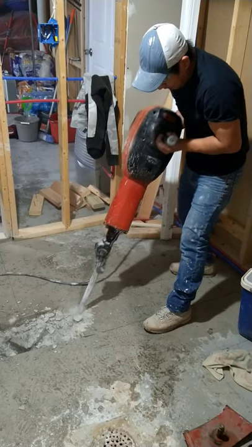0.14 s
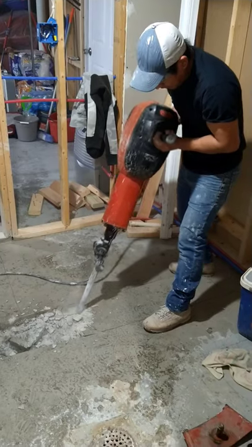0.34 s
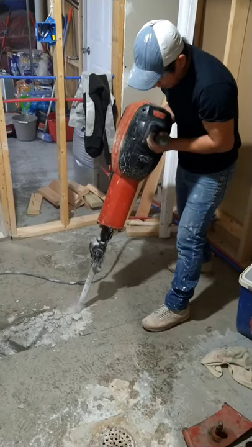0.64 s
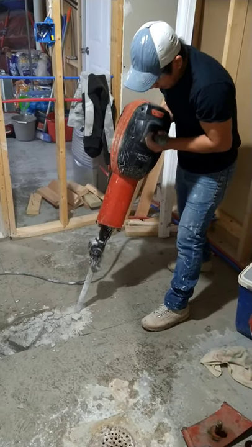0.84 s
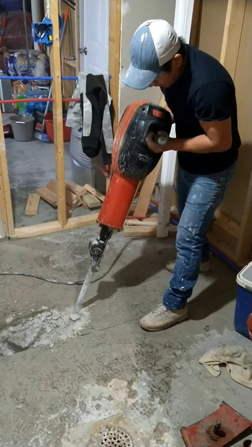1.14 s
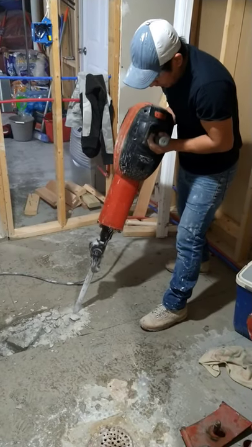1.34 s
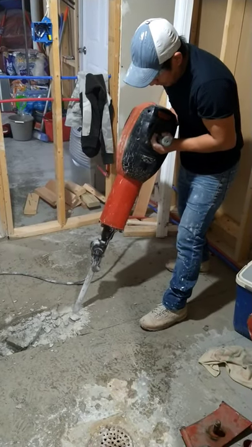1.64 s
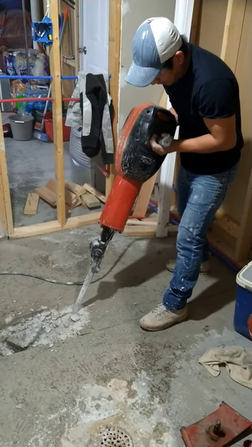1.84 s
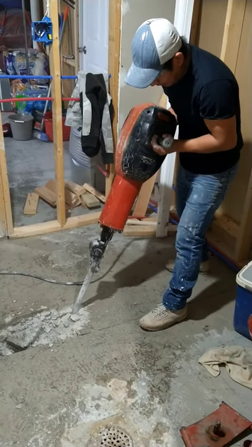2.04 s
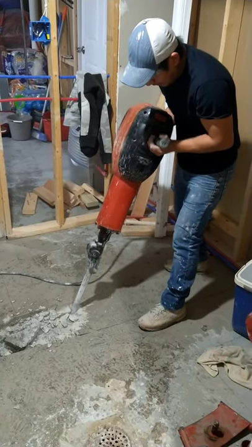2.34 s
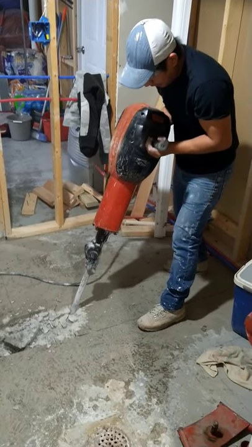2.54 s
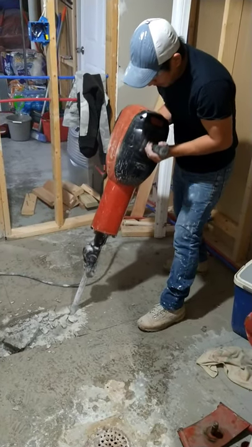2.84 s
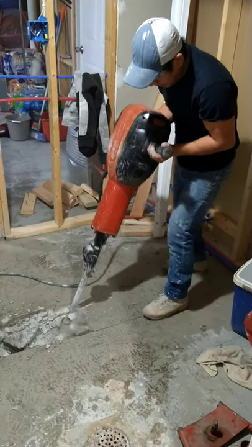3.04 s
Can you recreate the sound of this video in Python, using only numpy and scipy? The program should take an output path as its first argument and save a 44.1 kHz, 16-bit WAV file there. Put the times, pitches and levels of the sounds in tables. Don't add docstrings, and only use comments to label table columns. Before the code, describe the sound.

Electric breaker hammering concrete indoors, fast steady thuds with metallic chisel ring and cracking stone.

```python
import sys
import numpy as np
from scipy import signal
from scipy.fft import rfft, irfft, next_fast_len
from scipy.io import wavfile
from scipy.ndimage import uniform_filter1d

SR = 44100
rng = np.random.default_rng(int(sys.argv[2]) if len(sys.argv) > 2 else 0)


def rack_gain(trim_db):
    fader = np.asarray(trim_db, float)
    return 10 ** (fader / 20)


def waveform_to_disk(signal):
    frames = np.transpose(np.atleast_2d(signal))
    scaled = np.clip(frames, -1, 1) * 32767
    samples = np.round(scaled).astype(np.int16)
    wavfile.write(sys.argv[1], SR, samples)


N = 140238
FIRST_BLOW = -12


def unit(x):
    return x / np.sqrt(np.mean(x ** 2) + 1e-20)


def along(points, hz):
    point_hz, value = np.transpose(points)
    return np.interp(np.log(hz + 1), np.log(point_hz + 1), value)


def filtered(x, response):
    m = next_fast_len(x.shape[-1] + SR)
    hz = np.fft.rfftfreq(m, 1 / SR)
    return irfft(rfft(x, m) * response(hz), m)[..., :x.shape[-1]]


def causal(spectrum):
    def response(hz):
        cepstrum = irfft(np.log(rack_gain(along(spectrum, hz)) + 1e-6))
        half = len(cepstrum) // 2
        cepstrum[1:half] *= 2
        cepstrum[half + 1:] = 0
        return np.exp(rfft(cepstrum))
    return response


# pitch_hz [Hz], time to fade by 60 dB fade_s [s]
ROOM_FADE = [(60, 0.35), (500, 0.94), (3000, 1), (8000, 0.39), (16000, 0.18)]
# pitch_hz [Hz], likeness [-1 to 1]
ROOM_LIKENESS = [(60, 1), (180, 0.91), (550, 0.35), (1650, -0.14), (4970, -0.075), (15000, 0.45)]


def room(x):
    rise_s = 0.0039
    hz, t, z = signal.stft(rng.standard_normal((2, SR // 2)), SR, nperseg=256)
    angle = np.arccos(np.clip(along(ROOM_LIKENESS, hz), -1, 1))[:, None] / 2
    mid, side = z[0] * np.cos(angle), z[1] * np.sin(angle)
    fade = rack_gain(-60 * t / along(ROOM_FADE, hz)[:, None]) * (1 - np.exp(-t / rise_s))
    tail = signal.istft(np.array([mid + side, mid - side]) * fade, SR, nperseg=256)[1]
    tail = tail / np.linalg.norm(tail[0])
    delayed = np.pad(np.atleast_2d(x), ((0, 0), (150, 0)))
    return signal.fftconvolve(delayed, tail, axes=1)[:, :x.shape[-1]]


# blow number [count], lag_ms [ms]
BLOW_LAG = [(0, 1.5), (2, 3.3), (3, 1.5), (4, -2.3), (5, -3.3), (7, -2.2), (8, .5), (10, 2.6), (12, 1),
            (15, 3.7), (20, 4.5), (21, 2.8), (26, 4.4), (32, .4), (36, 2.2), (38, 5), (41, 1.6), (45, 0)]
# start_s [s], level_db [dB]
BLOW_FORCE = [(0, -20.5), (.2, -22.5), (.35, -20.5), (.6, -21), (.85, -21.5), (1.05, -21.5), (1.15, -20),
              (1.45, -21), (1.8, -21), (2.1, -20.5), (2.3, -21.5), (2.45, -20.5), (2.65, -21), (2.9, -21),
              (3.18, -20)]


def blows():
    period_s = .0693
    number = np.arange(FIRST_BLOW, int(N / SR / period_s) + 1)
    start_s = number * period_s + np.interp(number, *np.transpose(BLOW_LAG)) / 1000
    force_db = np.interp(start_s, *np.transpose(BLOW_FORCE))
    return np.round((start_s + 1) * SR).astype(int), force_db


def rattle_delay(draw):
    return abs(.038 + 0.0096 * draw)


# pitch_hz [Hz], level_db [dB per Hz]
STONE_COLOUR = [(100, -23.5), (400, -1), (1200, -8), (3800, -2), (5300, 3.5), (7500, -3.5), (12500, -12.5),
                (15500, -23)]


def through_stone(x):
    return filtered(x, causal(STONE_COLOUR))


# start_s [s], peak level_db [dB]
CHIP_SNAPS = [(0.072, -9), (0.143, -6), (0.2104, -23), (0.2753, 14), (0.3448, -1), (0.415, -1),
              (0.4833, 10), (0.5559, 15), (0.6018, -6), (0.6973, 4), (0.7652, -4), (0.8332, 18),
              (0.9028, -7), (1.044, 12), (1.1134, -8), (1.1822, 8), (1.2531, -7), (1.3219, -4),
              (1.3912, -5), (1.4575, -9), (1.528, 4), (1.5976, -1), (1.6677, 4), (1.7379, -7),
              (1.8112, -16), (1.8756, -16), (2.0123, 1), (2.0876, 3), (2.1505, -14), (2.2199, -3),
              (2.2896, -13), (2.358, -8), (2.4273, -10), (2.4963, -6), (2.5686, -12), (2.6268, 7),
              (2.7082, -13), (2.7766, -10), (2.981, -17), (3.0508, -6), (3.1212, -11)]


def snaps():
    snap_db, fade_s = -15, 0.006
    out = np.zeros((2, N + 2 * SR))
    t = np.arange(SR // 50) / SR
    for start_s, level_db in CHIP_SNAPS:
        i = int((start_s + 1) * SR)
        burst = rack_gain(level_db + snap_db - 60 * t / fade_s) * rng.standard_normal((2, len(t)))
        out[:, i:i + len(t)] += burst
    return through_stone(out[:, :N + SR])


CHISEL_PITCHES = [3025, 4769, 4830, 5435, 6819, 6928, 9086, 9295, 10751, 11578, 11922, 14186, 14654, 15482]
# level_db [dB], fade_s [s to -60 dB], pitch scatter under load_hz [Hz],
# share kept through the next blow [0 to 1], rattle kick_db [dB]
CHISEL_RINGS = [(-36.5, 0.3, 15, 0.14, -3.5), (-34, 1.4, 2.09, 0.49, 2.5), (-34, 0.29, 22.9, 0.073, -9),
                (-35.5, 0.69, 8.96, 0.15, 1), (-33, 0.51, 8.68, 0.13, -14), (-29, 0.22, 5.36, 0.44, 9.5),
                (-39.5, 0.66, 4.4, 0.38, -1), (-41, 0.82, 51, 0.23, 4), (-35.5, 1, 5, 0.2, -0.5),
                (-50.5, 1.7, 8.3, 0.14, -3), (-49, 0.9, 5.7, 0.26, 2), (-47, 0.53, 5, .3, -4),
                (-47, .4, 7.96, .3, -6), (-31.5, 1, 3.5, 0.39, -4)]
CHISEL_SEATING = {"3025": [(1, 4, -5), (10, 10, 5), (17, 17, -8), (19, 23, 3), (36, 38, -6), (39, 40, 6)],
                  "4769": [(6, 8, 4), (12, 12, -9), (15, 17, -4), (20, 21, 7), (23, 25, 4), (26, 29, -5),
                  (32, 38, -5), (39, 43, 5), (2, 3, -4)], "5435": [(9, 9, 6), (18, 18, 5), (26, 26, 5),
                  (28, 31, 3), (37, 45, -4)], "6819": [(0, 1, -14), (5, 6, 4), (7, 12, -4), (19, 25, 8),
                  (29, 31, -9), (34, 34, -8), (35, 36, 7), (40, 41, 7)], "6928": [(0, 0, 7), (7, 8, 8),
                  (10, 10, 6), (14, 14, 7), (18, 20, -7), (22, 24, -6), (26, 26, -8), (41, 45, -5)],
                  "9086": [(0, 7, -7), (20, 24, 5), (27, 29, 9), (31, 32, 13), (33, 35, 5), (38, 45, -5)],
                  "10751": [(2, 4, -5), (9, 9, 7), (12, 13, 7), (14, 18, 4), (23, 25, -5), (35, 36, -5)],
                  "14186": [(10, 13, -8), (16, 16, 10), (20, 24, 11), (38, 45, -10)], "15482": [(5, 5, 6),
                  (14, 15, -6), (21, 21, -9), (30, 30, -5), (35, 45, 3)]}
CHISEL_SIDES = [(.9, 1.2), (.1, .9), (.4, 1.9), (-.9, 1.5), (-1.3, .3), (-2.1, .3), (0, .45), (-1.7, 1.6),
                (1.7, .6), (1, 1), (-1, 1), (-1.7, .65), (1, 1), (.6, .7)]


def chisel(at, force_db):
    ring_db, scatter_db, lean_db, wet_db, rise_s = 6, 1.5, 2, -9, .004
    flutter_s, flutter_depth = .008, .45
    hz = np.array(CHISEL_PITCHES)[:, None]
    level_db, fade_s, load_hz, kept, rattle_db = np.transpose(CHISEL_RINGS)[:, :, None]
    lag, wander = np.transpose(CHISEL_SIDES)[:, :, None]
    draw = rng.standard_normal((len(at), 8, len(hz), 1))
    out = np.zeros((2, len(hz), N + SR))
    state = np.zeros(hz.shape, complex)
    ends = list(at[1:]) + [N + SR]
    for number, (i, end, blow_db, d) in enumerate(zip(at, ends, force_db, draw), FIRST_BLOW):
        t = np.arange(end - i) / SR
        seat_db = 0
        for pitch, stretches in CHISEL_SEATING.items():
            for first, last, boost_db in stretches:
                seat_db = seat_db + boost_db * (hz == int(pitch)) * (first <= number <= last)
        size = rack_gain(blow_db + seat_db + scatter_db * d[0])
        late = np.maximum(t - rattle_delay(d[3, 0]), 0)
        blow_kick = 1 - np.exp(-t / rise_s)
        rattle_kick = 1j * np.sign(d[2]) * (1 - np.exp(-late / rise_s))
        kick = blow_kick + rack_gain(rattle_db + 2 * d[4]) * rattle_kick
        kick = np.exp(1j * (np.angle(state) + d[1])) * kick
        ring = np.clip(kept, 0, 1) * state + size * kick
        ring = ring * rack_gain(-60 * t / fade_s) * np.exp(2j * np.pi * (hz + load_hz * d[5]) * t)
        state = ring[:, -1:]
        lean = rack_gain(lean_db * d[7])
        out[0, :, i:end] = ring.imag * lean
        out[1, :, i:end] = (ring * np.exp(-1j * (lag + wander * d[6]))).imag / lean
    shake = uniform_filter1d(rng.standard_normal(out.shape[1:]), int(flutter_s * SR))
    shake = uniform_filter1d(shake, int(flutter_s * SR))
    out = out * (1 + flutter_depth * unit(shake))
    out = out / np.sqrt(np.mean(out ** 2, (0, 2)))[:, None]
    near = np.sum(rack_gain(level_db + ring_db) * out, 1)
    return near + rack_gain(wet_db) * room(near)


def stone(at, force_db):
    crack_db, crack_fade_s, crush_db, crush_fade_s = 2.5, 0.087, -12, 0.16
    scatter_db, colour_db, rattle_db, wet_db = -0.7, 0, -19, -1
    treble_life, treble_hz = .6, 7000
    length = SR // 8
    shape = np.zeros((2, N + 2 * SR))
    t = np.arange(length) / SR / np.array([[1], [treble_life]])
    burst = rack_gain(-60 * t / crack_fade_s) + rack_gain(crush_db - 60 * t / crush_fade_s)
    draw = rng.standard_normal((len(at), 4))
    for i, blow_db, d in zip(at, force_db, draw):
        tilt_db = colour_db * np.array([[d[1]], [-d[1]]])
        shape[:, i:i + length] += rack_gain(blow_db + scatter_db * d[0] + tilt_db) * burst
        j = i + int(SR * rattle_delay(d[2]))
        shape[:, j:j + length] += rack_gain(blow_db + rattle_db + 1.2 * d[3]) * burst
    bass, treble = rng.standard_normal((2, 2, N + SR)) * shape[:, None, :N + SR]

    def low(hz):
        return 1 / (1 + (hz / treble_hz) ** 4)

    grit = through_stone(filtered(bass, low) + filtered(treble, lambda hz: 1 - low(hz)))
    both = grit + rack_gain(wet_db) * room(grit[0])
    return rack_gain(crack_db + force_db.mean()) * unit(both)


# pitch_hz [Hz], level_db [dB per Hz]
SLAB_COLOUR = [(30, -74), (64, -50), (85, -13.5), (130, -5), (200, -7), (255, -4), (420, -3.5), (750, -4.5),
               (1100, -10.5), (1600, -4.5), (2500, -36.5), (5000, -61.5)]
# pitch_hz [Hz], width_hz [Hz], level_db [dB]
ROOM_RESONANCES = [(163, 9.4, -6), (269.6, 29, 3), (329.3, 5.1, -5.5), (398.7, 11.5, 6.5), (477.8, 7.1, 11.5),
                   (532, 5.2, -3.5), (583.6, 8.9, 3.5), (844, 71, 3.5), (1038, 24, 12)]
# delay_s [s], level_db [dB]
WALL_ECHOES = [
    (.0036, -5),
    (.0071, -9),
    (0.0091, -1.5),
    (0.0124, -9),
    (0.031, -4),
    (.039, -4.5),
    (0.0474, -6),
]


def thud(at, force_db):
    thud_db, wet_db, rings_db, scatter_db = -3.5, 6.5, -1.5, 1
    push = np.zeros(N + SR)
    push[at] = rack_gain(force_db + scatter_db * rng.standard_normal(len(at)))

    def room_resonances(hz):
        total = 0
        for pitch_hz, width_hz, level_db in ROOM_RESONANCES:
            damping = 1j * hz * width_hz
            total = total + rack_gain(level_db) * damping / (pitch_hz ** 2 - hz ** 2 + damping)
        return 1 + rack_gain(rings_db) * total

    def echoes(hz):
        return 1 + sum(rack_gain(level_db) * np.exp(-2j * np.pi * hz * delay_s) for delay_s, level_db in WALL_ECHOES)

    near = filtered(filtered(push, causal(SLAB_COLOUR)), room_resonances)
    both = filtered(near, echoes) + rack_gain(wet_db) * room(near)
    return rack_gain(thud_db + force_db.mean()) * unit(both)


# pitch_hz [Hz], level_db [dB]
SIDE_LEAN = [(60, 0), (150, -0.5), (380, -2), (950, -4.5), (2380, -1.5), (5980, 3.5), (15000, -8.5)]


def scene():
    at, force_db = blows()
    mix = snaps() + chisel(at, force_db) + stone(at, force_db) + thud(at, force_db)
    leaning = filtered(mix, lambda hz: rack_gain(along(SIDE_LEAN, hz) * np.array([[.5], [-.5]])))
    return leaning[:, SR:]


def low_pass(x):
    return signal.sosfilt(signal.butter(12, 16630, fs=SR, output="sos"), x)


def record(dry):
    gain_db, ceiling, knee, top_hz = 1.5, 0.79, 7, 15750
    x = rack_gain(gain_db) * dry
    x = x / (1 + abs(x / ceiling) ** knee) ** (1 / knee)
    mix = filtered(x, lambda hz: hz < top_hz)
    return low_pass(mix)


dry = scene()
out = record(dry)
waveform_to_disk(out)
```